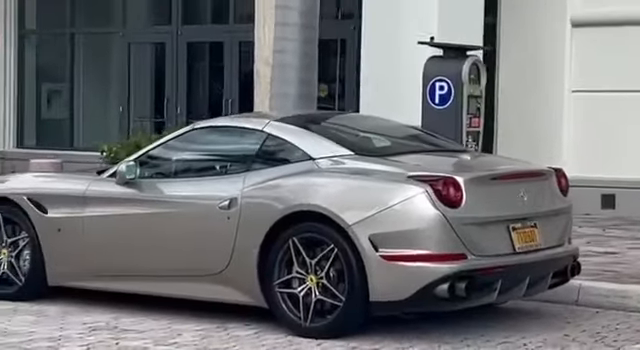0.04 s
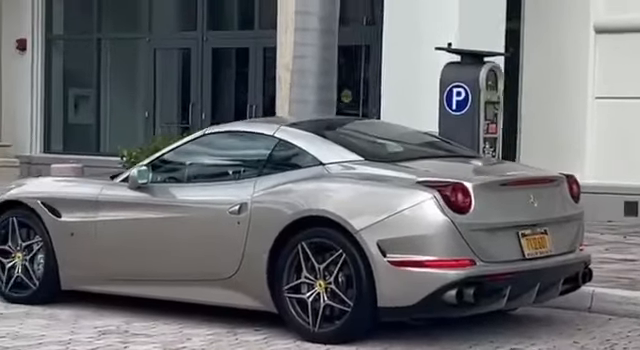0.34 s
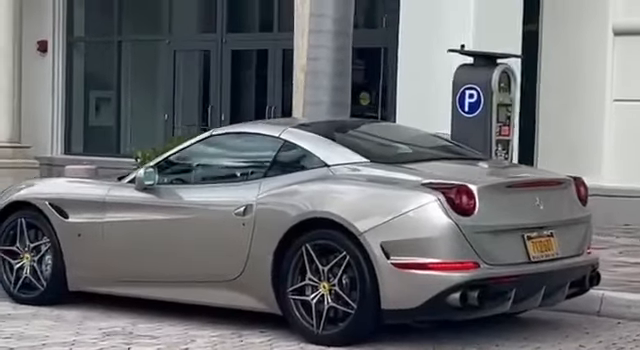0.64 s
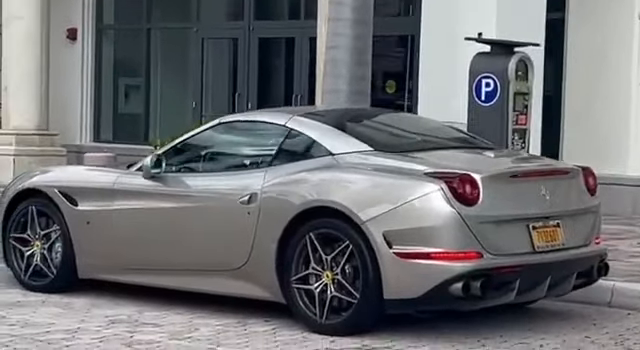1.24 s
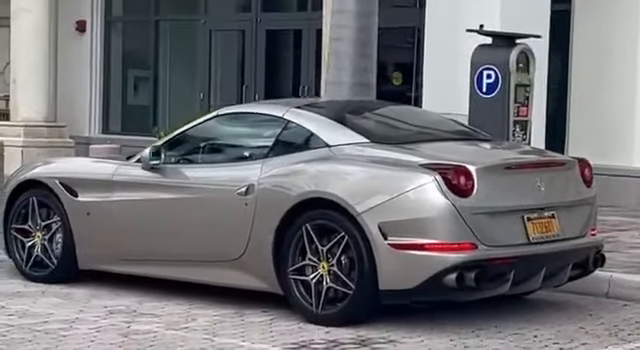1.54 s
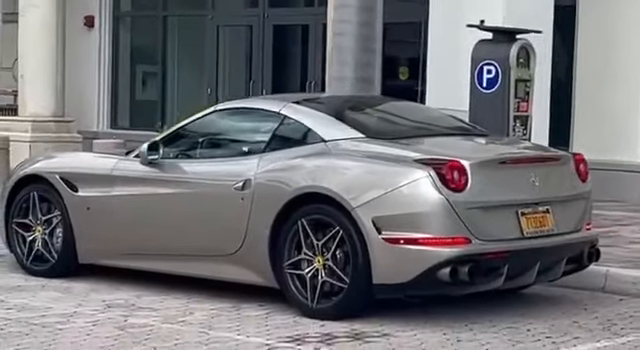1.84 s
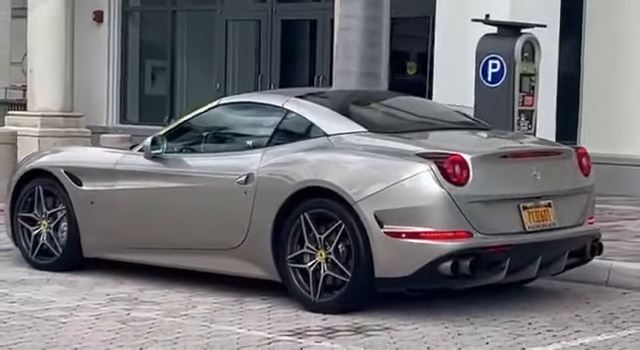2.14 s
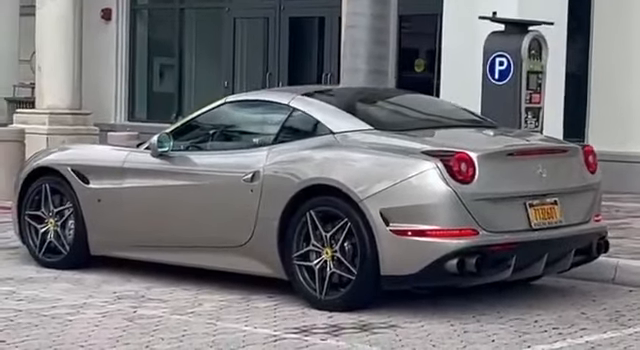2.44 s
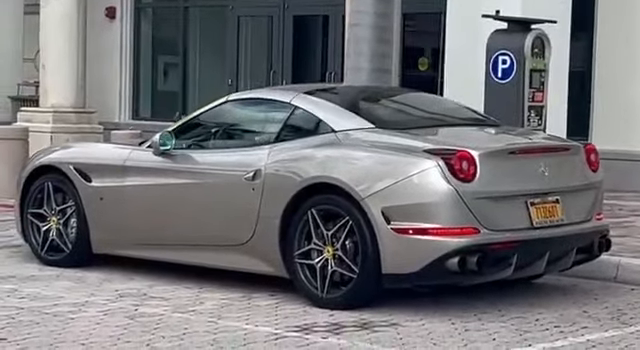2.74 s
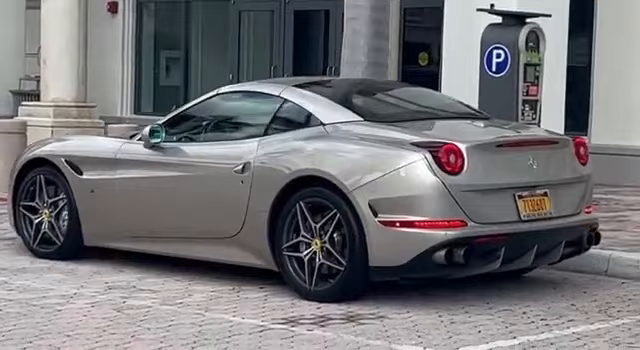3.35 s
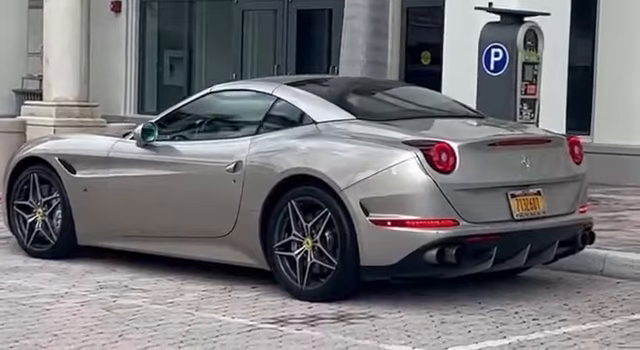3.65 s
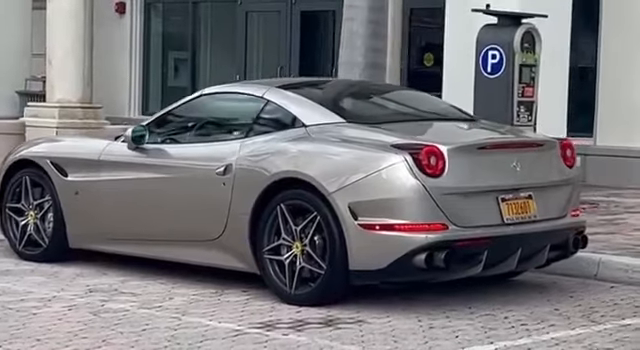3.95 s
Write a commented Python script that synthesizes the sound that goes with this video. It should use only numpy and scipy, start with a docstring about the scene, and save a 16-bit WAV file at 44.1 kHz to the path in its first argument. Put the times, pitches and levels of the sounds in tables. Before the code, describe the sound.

A sports car starts on a quiet street. For the first three seconds there is only distant traffic, soft low microphone bumps, faint scuffs around 0.5 seconds and a very faint whirr near 2.5. At 3 seconds the starter clacks in and whines through three quick pulses. At about 3.4 the engine catches and revs up with a loud, booming, raspy exhaust roar, lasting until the end at 4 seconds.

```python
"""A V8 sports car starts up, parked on a quiet street. The starter pinion clacks in and its gears whine
through three compressions; then the engine catches and flares, its firings booming through the exhaust
while puffs of gas roar and rasp from the tailpipes. Before that there is only distant traffic, a few
faint scuffs, soft low bumps on the hand-held microphone and a faint whirr, likely the fuel pump."""
import sys
import numpy as np
from scipy import signal
from scipy.fft import rfft, irfft, next_fast_len
from scipy.io import wavfile
from scipy.ndimage import map_coordinates

SR = 44100
rng = np.random.default_rng(int(sys.argv[2]) if len(sys.argv) > 2 else 0)


def transcribe(u):
    """Save the signal u as a 16-bit wav file named by the first command-line argument.

    u: samples, shape (n,) or (channels, n), limited to [-1, 1]; the rate is SR.
    q: integer samples, one column per channel.
    """
    v = np.clip(np.atleast_2d(u).T, -1, 1)
    q = np.round(v * 32767).astype(np.int16)
    wavfile.write(sys.argv[1], SR, q)


N = 176400
T = np.arange(N) / SR
CATCH_S = 3.41  # the engine begins to fire


def amp(db):
    """Decibels to gain."""
    return 10 ** (np.asarray(db) / 20)


def unit(x):
    """Scale to rms 1."""
    return x / np.sqrt(np.mean(x ** 2) + 1e-20)


def along(points, hz):
    """Read (Hz, value) points on a log frequency axis."""
    f, v = np.transpose(points)
    return np.interp(np.log(hz + 1), np.log(f + 1), v)


def curves(rows):
    """One automation curve for each column after the time."""
    s, *cols = np.transpose(rows)
    return [np.interp(T, s, c) for c in cols]


def wobble(rate):
    """A smooth random curve, rate knots a second."""
    return map_coordinates(rng.standard_normal(int(N * rate / SR) + 4), [T * rate])


def swell(s, width):
    """A bell-shaped rise and fall centred on s seconds."""
    return np.exp(-.5 * ((T - s) / width) ** 2)


def ramp(s, length):
    """A fade from 0 to 1 starting at s seconds."""
    return np.clip((T - s) / length, 0, 1)


def filtered(x, response):
    """Shape x with a frequency response."""
    m = next_fast_len(N + SR // 2)
    return irfft(rfft(x, m) * response(np.fft.rfftfreq(m, 1 / SR)), m)[..., :N]


def through(x, colour, size=8192):
    """Minimum-phase filter with the given colour: it rings only after each hit."""
    cepstrum = irfft(np.log(amp(along(colour, np.fft.rfftfreq(size, 1 / SR))) + 1e-6))
    cepstrum[1:size // 2] *= 2
    cepstrum[size // 2 + 1:] = 0
    return signal.fftconvolve(x, irfft(np.exp(rfft(cepstrum))))[:N]


def ringing(x, modes):
    """Send x through resonances of alternating polarity."""
    return filtered(x, lambda f: sum(
        (-1) ** k * amp(db) * 1j * f * width / (hz * hz - f * f + 1j * f * width)
        for k, (hz, width, db) in enumerate(modes)))


def noise(colour):
    """Coloured stereo noise of rms 1."""
    # Stereo likeness. Each row: frequency in Hz, correlation of left and right.
    likeness = [(200, 0.99), (600, 0.087), (1100, 0.28), (1700, 1)]
    angle = lambda hz: np.arccos(np.clip(along(likeness, hz), -1, 1)) / 2
    gains = lambda hz: amp(along(colour, hz)) * [np.cos(angle(hz)), np.sin(angle(hz))]
    mid, side = filtered(rng.standard_normal((2, N)), gains)
    return unit(np.array([mid + side, mid - side]))


def traffic(bed_db=-47):
    """A bed of distant traffic, with one car drawing nearer."""
    # Tone of the bed and of the nearing car. Each row: frequency in Hz, level in dB.
    bed_colour = [(55, -11.5), (240, -9.5), (800, -14), (1800, -23), (4500, -33), (6800, -36),
                  (12000, -49.5)]
    car_colour = [(60, -2), (180, 6), (330, 1.5), (500, -7), (2000, -35.5)]
    # The car's approach. Each row: time in seconds, level in dB.
    approach = [(0.1, -58), (0.9, -44), (2.45, -43)]
    car_db, = curves(approach)
    return amp(bed_db) * noise(bed_colour) + amp(car_db) * noise(car_colour)


def microphone_bumps(width_cycles=0.64, fall_per_s=25, scrape_db=-8, rumble_db=-45, flutter_db=2.5):
    """Dull, scraping pushes that fall in pitch and a brief hand rub, over a fluttering rumble of air."""
    # Soft bumps. Each row: centre in seconds, peak in dB, pitch in Hz.
    pushes = [(0.088, -29.5, 265), (0.102, -30.5, 80), (0.506, -25.5, 176), (0.557, -31, 207),
              (0.647, -28, 101), (0.771, -30, 88), (1.45, -25, 118), (1.573, -25, 176), (1.876, -26.5, 79),
              (1.924, -29, 140), (2.775, -21.5, 125), (2.847, -28.5, 94), (2.935, -24.5, 138),
              (3.097, -22.5, 139)]
    # The hand rubs the case. Each row: centre in seconds, width in seconds, level in dB.
    hand_rubs = [(2.802, 0.0053, -26), (2.813, 0.063, -31.5)]
    # Tone of the rubbing and of air on the microphone. Each row: frequency in Hz, level in dB.
    rub_colour = [(30, -13.5), (75, 7), (330, -6.5), (1300, -25.5), (8000, -49.5)]
    air_colour = [(20, -38), (55, -2.5), (90, -0.5), (700, -44)]
    thud = lambda t, hz: np.sin(2 * np.pi * hz * t * (1 - fall_per_s * t / 2))
    scrape = noise(rub_colour)
    bumps = sum(amp(db) * swell(s, width_cycles / hz) * (thud(T - s, hz) + amp(scrape_db) * scrape)
                for s, db, hz in pushes)
    rubs = sum(amp(db) * swell(s, width) for s, width, db in hand_rubs) * scrape
    rumble = unit(amp(flutter_db * wobble(30.21)) * noise(air_colour))
    return bumps + rubs + amp(rumble_db) * rumble


def scuffs(attack_s=0.0094, release_s=0.062, grit_db=1.5):
    """A few faint, gritty scuffs on the paving."""
    # The strokes. Each row: start in seconds, length in seconds, level in dB.
    strokes = [(0.433, .06, -52.5), (0.553, 0.083, -52.5), (.66, 0.315, -60.5)]
    # Tone of the grit. Each row: frequency in Hz, level in dB.
    grit_colour = [(1700, -1), (3300, 5.5), (4500, -13), (6500, -4), (12000, -20)]
    envelope = sum(amp(db) * ramp(s, attack_s) * (1 - ramp(s + length, release_s))
                   for s, length, db in strokes)
    return envelope * unit(amp(grit_db * wobble(700)) * noise(grit_colour))


def fuel_pump(peak_s=2.555, width_s=0.335, pitch_hz=3020, width_hz=330, level_db=-63):
    """A narrow band of noise whirrs while the fuel line is primed."""
    whirr = unit(ringing(rng.standard_normal(N), [(pitch_hz, width_hz, 0)]))
    return amp(level_db) * swell(peak_s, width_s) * whirr


def pinion(t60=0.08, attack_s=0.0062, ring_db=-9, crack_db=-1):
    """The solenoid throws the pinion into the flywheel: a quick cluster of metal contacts."""
    # The contacts. Each row: start in seconds, strength in dB.
    clacks = [(3.012, -47), (3.025, -26.5), (3.033, -21.5)]
    # Resonances of the starter housing. Each row: frequency in Hz, width in Hz, level in dB.
    housing = [(1063, 55, -5), (1620, 52, -1.5), (5800, 180, -7)]
    # Tone of the crack. Each row: frequency in Hz, level in dB.
    crack_colour = [(300, -12), (800, 4.5), (3790, -9), (6000, -28.5)]
    blows = sum(amp(db - 60 * np.maximum(T - s, 0) / t60) * ramp(s, attack_s) for s, db in clacks)
    ring = unit(ringing(rng.standard_normal(N), housing))
    return blows * (amp(ring_db) * ring + amp(crack_db) * noise(crack_colour))


def starter(unsteady=0.018, even_db=-4.5, rattle_db=-44, harmonics=9):
    """A rough gear whine speeds up after every compression, over the rattle of the teeth."""
    # Cranking. Each row: time in seconds, gear mesh rate in Hz, whine strength in dB.
    cranking = [(3.09, 800, -44), (3.165, 958, -36), (3.228, 921, -42), (3.245, 1035, -45),
                (3.268, 1195, -43), (3.29, 1142, -27.5), (3.335, 1093, -56), (3.358, 1336, -45),
                (3.388, 1230, -30), (3.42, 1150, -61)]
    # Tone of the gears. Each row: frequency in Hz, level in dB.
    gear_colour = [(300, -16), (1000, -5.5), (2100, -16.5), (2850, -8.5), (3570, -7), (4300, -15.5),
                   (6500, -16.5), (12000, -35)]
    mesh_hz, whine_db = curves(cranking)
    phase = 2 * np.pi * np.cumsum(mesh_hz * (1 + unsteady * wobble(600))) / SR
    harmonic_db = lambda k: along(gear_colour, k * mesh_hz) + even_db * (k % 2 == 0) + 2 * wobble(180)
    whine = sum(amp(whine_db + harmonic_db(k)) * np.sin(k * phase) for k in range(1, harmonics + 1))
    rattle = amp(rattle_db + wobble(160)) * noise(gear_colour)
    engaged = ramp(3.005, 0.068) * (1 - ramp(3.5, .04))
    return engaged * (whine + rattle)


def firing_pulses(bank_cycles, scatter_db=4, jitter_s=.0005):
    """Eight unequal cylinders fire in turn into the exhaust pipe, two to each bank cycle."""
    # Strength of each cylinder in dB, in firing order.
    cylinders = [1.5, 7, -1.5, 5, 5.5, 3.5, -10.5, 3.5]
    # Response of the pipe. Each row: frequency in Hz, gain in dB.
    pipe = [(33, -48.5), (58, 7), (100, -6.5), (142, -8.5), (180, 1), (270, -2), (380, -18.5), (650, -18),
            (1500, -56.5)]
    onsets = np.flatnonzero(np.diff(np.floor(2 * bank_cycles)))
    scatter, jitter = rng.standard_normal((len(onsets), 2)).T
    strengths = amp(np.resize(cylinders, len(onsets)) + scatter_db * np.tanh(scatter))
    onsets = np.clip(onsets + (jitter_s * SR * jitter).astype(int), 0, N - 1)
    pulses = through(np.bincount(onsets, strengths, N), pipe)
    return pulses / pulses[T > CATCH_S].std()


def exhaust_hum(bank_cycles, waver_db=3.0):
    """Deep, wavering tones that follow the engine's speed."""
    # The hum. Each row: time in seconds, then rms level in dB of the bank rate's first four multiples.
    hum_levels = [(3.5, -62.5, -53, -23, -26), (3.57, -36, -29, -34, -20.5),
                  (3.65, -23.5, -14.5, -8.5, -20), (3.76, -30, -31, -25, -21),
                  (3.86, -36, -24.5, -20, -16.5), (3.955, -27, -35, -18.5, -42), (4, -28, -15, -18, -41)]
    # Further tones. Each row: multiple of the bank rate, level in dB relative to the fourth.
    overtones = [(2.5, -5.5), (3.5, -26), (6, -22.5), (8, -19.5), (13, -25.5)]
    levels = curves(hum_levels)
    orders = list(enumerate(levels, 1)) + [(k, levels[-1] + db) for k, db in overtones]
    tone = lambda k: np.sqrt(2) * np.sin(2 * np.pi * (k * bank_cycles + rng.random()))
    return sum(amp(db + waver_db * wobble(35)) * tone(k) for k, db in orders)


def exhaust_gas(bank_cycles, roar_db, rasp_db, chop_db=1.5, rush_db=-1.5, ring_db=-6):
    """Every firing lets out a puff of gas that roars, rings the pipe and rasps."""
    # Tone of the roar and of the rasp. Each row: frequency in Hz, level in dB.
    roar_colour = [(170, -15), (330, 4), (600, 3.5), (760, -8), (1100, 3.5), (1500, -32.5)]
    rasp_colour = [(700, -17), (1300, 1.5), (1830, -5), (2150, 1.5), (3860, -4), (5010, -13.5),
                   (7130, -13.5), (9420, -25)]
    # Pipe resonances. Each row: frequency in Hz, width in Hz, level in dB.
    pipe_modes = [(883, 25, 6), (670, 10, -6), (586, 14, -5.5)]
    puffs = unit(amp(chop_db * np.cos(4 * np.pi * bank_cycles) + wobble(70)))
    ring = unit(ringing(noise(roar_colour), pipe_modes))
    roar = amp(rush_db) * noise(roar_colour) + amp(ring_db) * ring
    return puffs * (amp(roar_db) * roar + amp(rasp_db) * noise(rasp_colour))


def engine(pulse_trim_db=-1, boom_s=3.53, boom_width_s=0.027, boom_hz=67.2, boom_db=-12):
    """The V8 catches and flares; its first firings set the whole exhaust booming."""
    # Engine speed. Each row: time in seconds, firing rate of one cylinder bank in Hz.
    speed = [(3.42, 30.05), (3.6, 54.7), (3.7, 66.1), (3.78, 69.27), (3.91, 69.9), (3.96, 65.85)]
    # Exhaust effort. Each row: time in seconds, then strength in dB of pulses, roar and rasp.
    effort = [(3.44, -29, -37, -41.5), (3.53, -18, -29, -33.5), (3.6, -15.5, -32.5, -35.5),
              (3.645, -16, -26.5, -36.5), (3.76, -17, -30.5, -39.5), (3.9, -16, -34, -41),
              (3.95, -17, -30.5, -39.5), (4, -24, -40.5, -42)]
    bank_hz, = curves(speed)
    bank_cycles = np.cumsum(bank_hz) / SR
    pulse_db, roar_db, rasp_db = curves(effort)
    pulses = amp(pulse_db + pulse_trim_db) * firing_pulses(bank_cycles)
    hum = exhaust_hum(bank_cycles)
    boom = amp(boom_db) * swell(boom_s, boom_width_s) * np.sin(2 * np.pi * boom_hz * T)
    gas = exhaust_gas(bank_cycles, roar_db, rasp_db)
    return ramp(CATCH_S, 0.061) * (pulses + boom + gas) + ramp(CATCH_S, 0.11) * hum


def placed(x):
    """Lean the midrange to the left."""
    # Panning. Each row: frequency in Hz, left minus right in dB.
    pan = [(200, 0.84), (350, 4.5), (1200, 5.5), (1600, 0)]
    gains = lambda hz: amp(along(pan, hz) * np.array([[.5], [-.5]]))
    return filtered(x, lambda hz: gains(hz) / gains(hz).mean(0))


def scene():
    """The car in the street, and the bumps at the microphone."""
    car = engine() + pinion() + starter() + fuel_pump()
    return placed(car + traffic() + scuffs()) + microphone_bumps()


def record(dry, ceiling=.92, top_hz=12000, fade_s=.004):
    """Rounded peaks, a soft stop and a steep top cut; the two ports slip out of phase in the treble."""
    # The left and right ports. Each row: frequency in Hz, half their phase gap in radians.
    port_phase = [(4650, 0.016), (5030, 1.47), (5350, 0.13), (7300, 0.087), (10500, 1.03)]
    rounded = dry / (1 + np.abs(dry / ceiling) ** 6) ** (1 / 6)
    stop = 1 - ramp(T[-1] - fade_s, fade_s)
    ports = lambda hz: np.exp(1j * along(port_phase, hz) * np.array([[1], [-1]]))
    return filtered(rounded * stop, lambda hz: ports(hz) * (hz < top_hz))


dry = scene()
out = record(dry)
transcribe(out)
```